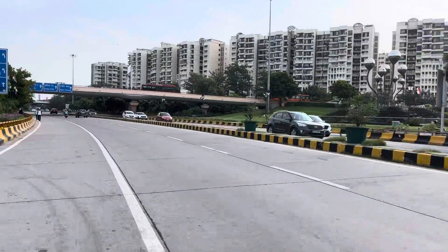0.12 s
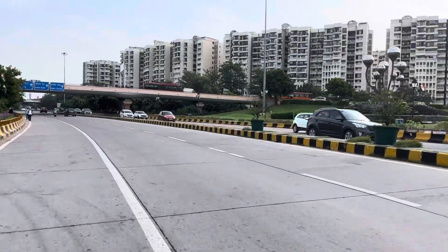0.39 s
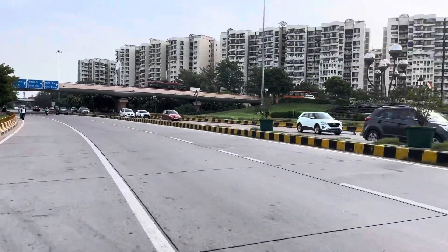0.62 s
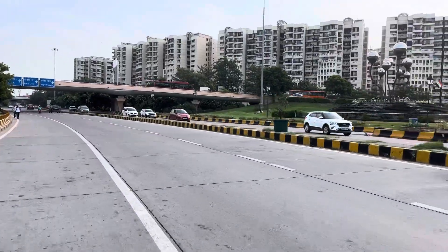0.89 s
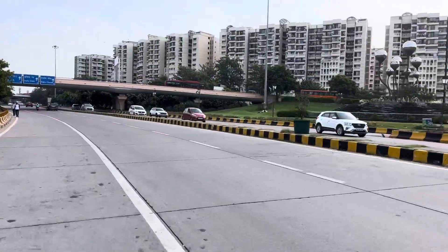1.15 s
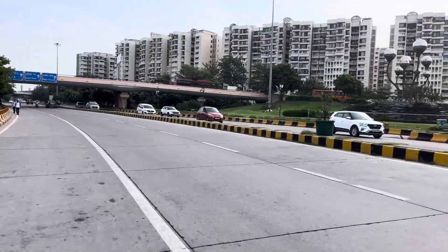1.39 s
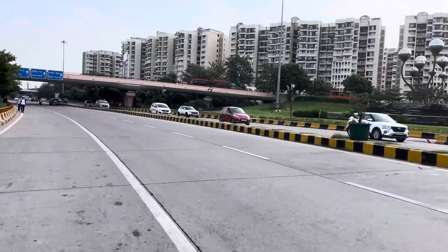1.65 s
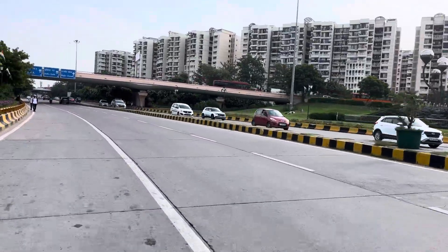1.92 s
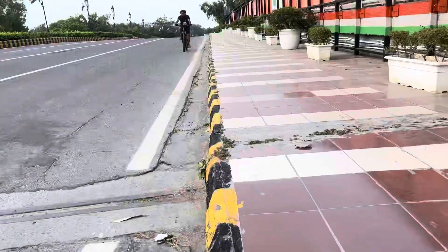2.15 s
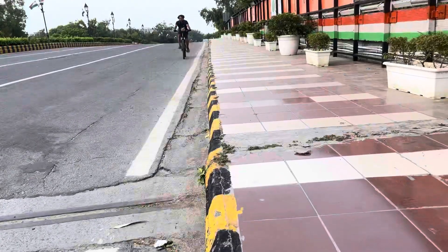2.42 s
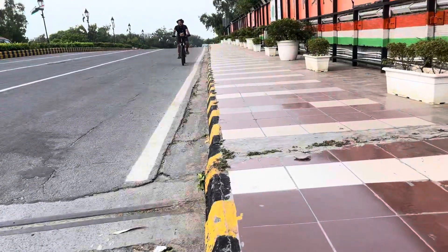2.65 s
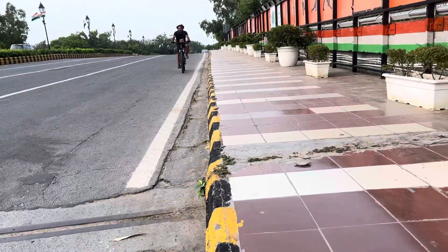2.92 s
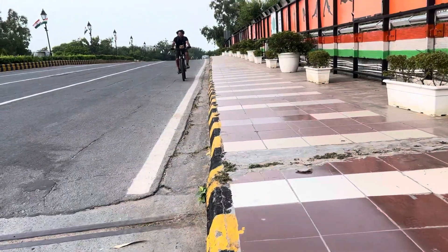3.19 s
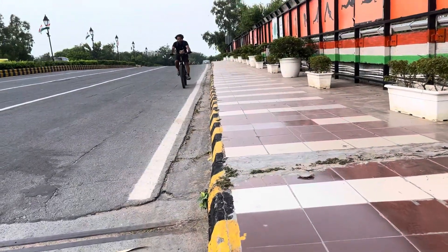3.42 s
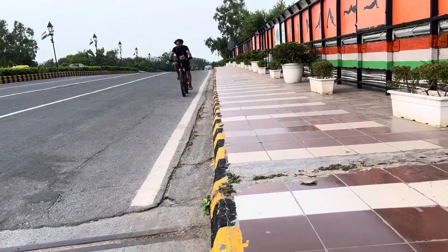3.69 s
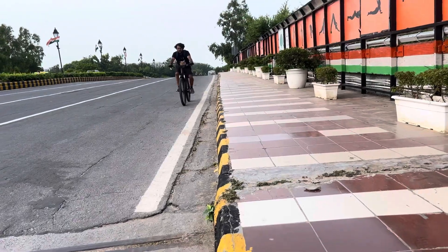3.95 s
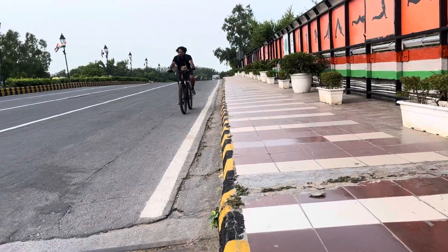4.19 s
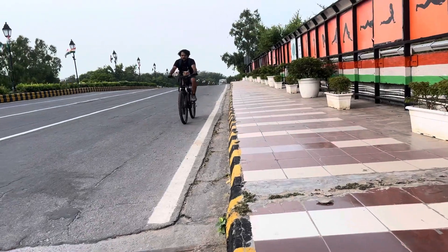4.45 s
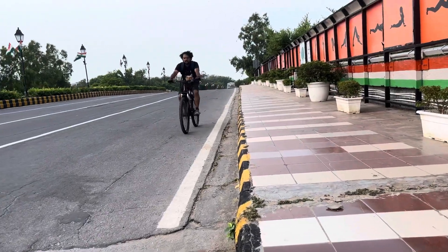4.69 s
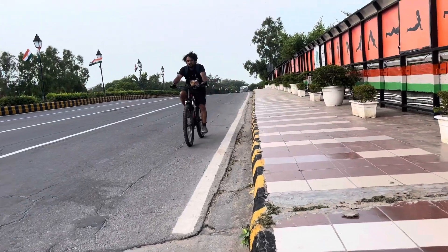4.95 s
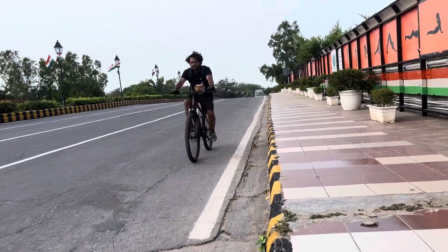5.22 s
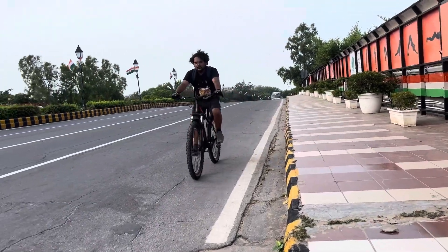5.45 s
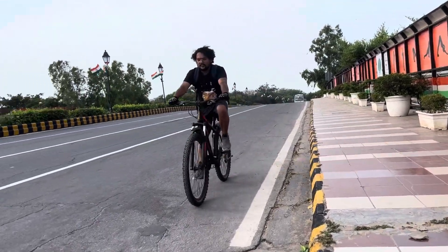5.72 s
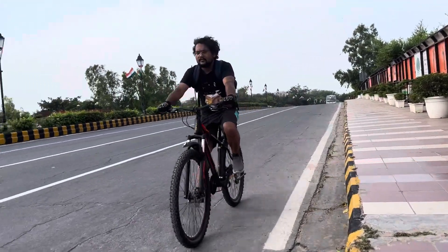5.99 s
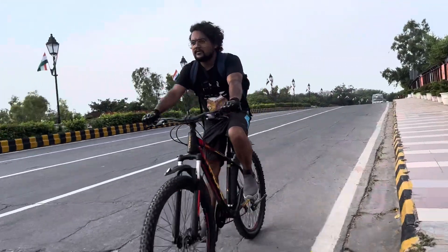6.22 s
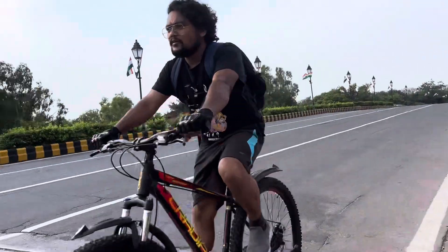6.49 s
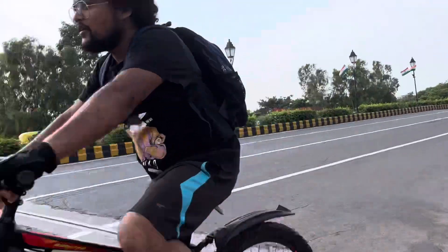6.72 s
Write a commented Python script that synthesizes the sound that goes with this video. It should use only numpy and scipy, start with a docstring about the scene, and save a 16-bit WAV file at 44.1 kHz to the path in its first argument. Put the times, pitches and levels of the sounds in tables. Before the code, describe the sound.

Handheld stereo microphone at the roadside, wind buffeting in low thuds over dull traffic. One brief two-tone-like beep, then a single-cylinder motorbike swells from behind. Suddenly another street: a strong tyre wash and diesel hum recede, metal rattles over bumps, and two quick slaps mark a road joint. Quieter traffic and a wavering low drone remain while knobbly bicycle tyres and crisp, uneven freewheel clicks come near.

```python
"""A wide highway is heard first: far traffic, thumping wind, a short horn and a motorbike closing in.
Then an avenue: a heavy vehicle draws away as loose metal rattles, an engine drones, a bicycle rolls up ticking.
Traffic and tyres are coloured noise, engines and horn are wandering sines, and metal is struck resonances.
A pair of microphone ports hears each source with its own lead, tilt and share of common sound."""
import sys
import numpy as np
from scipy import signal
from scipy.fft import rfft, irfft, next_fast_len
from scipy.io import wavfile
from scipy.ndimage import uniform_filter1d, map_coordinates

SR = 44100
rng = np.random.default_rng(int(sys.argv[2]) if len(sys.argv) > 2 else 0)


def to_wav(sig):
    """Store sig (one row per channel, or 1-D mono) as 16-bit WAV at the path in sys.argv[1].

    Samples outside -1..1 are clipped; the rate is SR.
    """
    pcm = np.clip(np.atleast_2d(sig), -1, 1) * 32767
    pcm = np.round(pcm).astype(np.int16)
    wavfile.write(sys.argv[1], SR, pcm.T)  # frames by channels


def decibels_to_gain(level_db):
    """Convert a level in decibels to a linear amplitude gain (20 dB per decade)."""
    exponent = np.asarray(level_db, float) / 20
    return 10 ** exponent


N = 302526

# The two ports. Each row: frequency in Hz, share of sound common to both from 0 to 1.
COMMON_SHARE = [(60, .955), (200, .84), (400, .5), (900, .7), (1500, .75), (2500, .5), (4000, .3),
                (6500, .55), (7300, .4), (7800, 1), (9000, 1), (10000, .45), (10900, 1), (13000, 1),
                (13800, .4), (14500, 1)]
# Balance of the ports. Each row: frequency in Hz, left over right in dB.
PORT_TILT = [(100, -1), (300, -1), (1500, -2), (1800, 0), (2500, -0.5), (4500, 3), (8000, 0)]
# Lead of the left port, by direction. Each row: frequency in Hz, lead in radians.
LEAD_AHEAD = [(0, 0), (400, .3), (700, 1.5), (1600, 2.2), (1750, 1), (3000, .6), (5000, .4), (6500, -1.3)]
LEAD_BEHIND = [(0, 0), (150, -.3), (400, -1.5), (700, -2.7), (1500, -3), (1750, -5), (4000, -6.3),
               (5500, -6.6), (6500, -7.3)]
LEAD_ALONG = [(0, 0), (200, .3), (400, .8), (700, 1.5), (1600, 2.5), (1750, 1.2), (3100, 2.5), (4000, 4.8),
              (6500, 5.7)]
# Treble arrives alike from every direction. Each row: frequency in Hz, lead of the left port in half turns.
TREBLE_LEAD = [(7800, -1), (9000, -1), (10900, -2), (13000, -2), (14500, -3), (22000, -3)]

# Traffic in each place. Each row: time in seconds, levels of rumble, body, tyre roar and tread hiss in dB.
HIGHWAY_LEVELS = [(0, -21, -33, -32, -51.5), (.25, -27.5, -32.5, -32.5, -49), (.6, -23.5, -32, -35, -48),
                  (.9, -26, -32.5, -34.5, -50), (1.15, -24, -34.5, -35, -47), (1.35, -23, -36, -34, -43),
                  (1.75, -20, -33, -29, -37.5), (2.08, -20.5, -29, -24.5, -45)]
AVENUE_LEVELS = [(2.1, -19.5, -20, -24, -35.5), (2.35, -32, -22, -25, -38), (2.6, -21, -22, -26.5, -42),
                 (2.85, -25.5, -25.5, -28, -43.5), (3.05, -26, -25, -29.5, -44),
                 (3.25, -26.5, -28, -29.5, -44), (3.4, -23, -28, -29, -45.5), (3.55, -27, -29, -32.5, -48),
                 (4.1, -27, -28, -32, -48.5), (4.9, -28.5, -28.5, -33.5, -50.5),
                 (5.7, -26, -28.5, -34, -51), (6.1, -26, -30, -34, -51), (6.86, -27, -28.5, -35, -48.5)]
# Colours of rumble, body, tyres and hiss, in that order. Each row: frequency in Hz, relative level in dB per Hz.
HIGHWAY_COLOURS = ([(18, -120), (25, -38), (40, -22), (60, 0), (90, -1.5), (115, -13), (170, -13.5),
                   (300, -120)], [(60, -120), (95, -41), (125, -3), (200, -4), (300, -8.5), (370, -11.5),
                   (450, -22), (700, -34), (1200, -120)], [(250, -120), (400, 3), (600, -0.5), (1100, 1.5),
                   (1600, -2.5), (2000, -9.5), (2600, -23.5), (3500, -43), (6000, -120)], [(1300, -120),
                   (2000, 2.5), (2600, -1.5), (3500, -6.5), (5000, -16.5), (7000, -17.5), (11000, -27),
                   (13500, -40), (15200, -27), (16500, -47)])
AVENUE_COLOURS = ([(18, -120), (25, -28), (38, -12), (55, -0.5), (85, -5), (115, -13), (170, -21),
                  (300, -120)], [(60, -120), (95, -14), (125, 1), (200, -4), (300, -7.5), (450, -14.5),
                  (700, -25), (1200, -120)], [(250, -120), (400, -1), (600, -2.5), (900, 0.5), (1250, -4),
                  (1600, -5.5), (1800, -14), (2400, -20.5), (3500, -37), (6000, -120)], [(1300, -120),
                  (2000, 3), (2800, 4), (4500, -1), (6500, -8), (8000, -13), (11000, -20), (13500, -21.5),
                  (15200, -33), (16500, -53)])
# Slow swells of wind. Each row: time in seconds, half length in seconds, rise of rumble in dB, rise of body in dB.
GUSTS = [(3.34, 0.2, 4, 6), (4.3, 0.14, 2, -0.5), (5.116, 0.15, 2.5, -1.5), (6.54, 0.17, 4.5, 0.5)]
# Single eddies thump the ports. Each row: time in seconds, half length in seconds, pitch at the middle in Hz,
# peak level in dB, rise of the traffic body in dB.
THUMPS = [(0.033, 0.037, 58, -18, 8.5), (0.092, 0.013, 69, -14, 3.5), (0.13, 0.031, 64, -13, 8.5),
          (.192, 0.012, 110, -11, 13.5), (0.285, 0.014, 85, -14.5, 2), (0.312, 0.027, 52.3, -23.5, 5),
          (0.348, 0.0065, 110, -17, 8.5), (0.405, 0.013, 71.5, -14.5, 7), (0.466, 0.032, 70.4, -19, 7.5),
          (0.517, 0.014, 75, -15.5, 8), (0.558, 0.019, 85, -17.5, 8), (0.586, 0.0071, 297, -18, 5),
          (0.598, 0.016, 141, -13.5, 8), (0.62, 0.01, 222, -12.5, 1.5), (.63, 0.016, 91, -7.5, 5),
          (.65, 0.0064, 173, -10, 7), (0.67, 0.007, 248, -16, 3), (0.677, 0.01, 107, -9.5, 4),
          (.697, 0.007, 116, -11.5, 5), (0.707, 0.0067, 230, -16, 7), (0.73, .015, 66, -14, 2),
          (0.762, 0.0072, 305, -18, 4.5), (0.774, 0.013, 96, -14.5, 8), (0.851, 0.018, 82.6, -12.5, 2),
          (0.958, 0.011, 84.5, -11.5, 7), (0.988, 0.019, 91, -13.5, 9), (1.122, 0.01, 81.5, -18, 0),
          (1.199, 0.013, 75, -13.5, 0), (5.665, 0.021, 90, -18.5, 4.5), (5.676, 0.005, 202, -20, 3),
          (5.706, 0.0074, 127, -18, 3), (5.72, 0.028, 69.6, -15, 5.5), (6.347, 0.02, 75, -16, 6.5)]
# A short blip at 990 Hz in the noise, then three small hollow knocks. Each row: start in seconds,
# level in dB before the onset softens it, pitch in Hz, time to fall 60 dB in seconds.
BLIP_AND_KNOCKS = [(.2965, -20, 990, 0.014), (2.495, -18, 806, 0.11), (5.536, -14, 760, 0.032),
                   (6.635, -31, 631, 0.33)]

# Motorbike. Each row: time in seconds, firing rate in Hz, exhaust level in dB, clatter level in dB.
BIKE = [(0, 30.23, -40, -56.5), (.9, 30.27, -34.5, -53.5), (1.34, 31.21, -31.5, -52),
        (1.62, 31.6, -30.5, -50.5), (1.74, 31.9, -30, -42.5), (1.88, 32.27, -30.5, -34),
        (2.08, 32.95, -25.5, -30.5)]
# Exhaust orders. Each row: multiple of the firing rate, relative level in dB, gain in dB at full throttle.
EXHAUST_ORDERS = [(1, -33, 0), (2, -9.5, 1), (3, 1.5, -5), (4, -15.5, 13.5), (5, -8.5, 4), (6, -2.5, -0.5),
                  (7, -5, -1), (8, -11, -3.5), (9, -14, 3), (10, -16, -1), (11, -17.5, 8), (12, -18.5, 1),
                  (13, -28, -6), (14, -20, 5)]
# Throttle. Each row: time in seconds, opening from 0 to 1.
THROTTLE = [(1.4, 0.07), (1.65, 0.2), (1.85, 0.82), (2.0, 0.8), (2.08, 0.8)]
# Colour of the valve and chain clatter. Each row: frequency in Hz, relative level in dB per Hz.
CLATTER_COLOUR = [(1200, -120), (2200, -2.5), (3200, 6.5), (5000, 3.5), (7500, -1), (11000, -3.5),
                  (13500, -7), (15200, -4), (16500, -34)]
# Horn partials. Each row: pitch in Hz, level at full drive in dB, dB lost per dB of weaker drive, waver in dB.
HORN_PARTIALS = [(464, -34, 0.6, -1.5), (925, -32, 1.4, 1), (1375, -44, 1.5, 3), (1865, -41, 0.5, 2.5)]
# The horn speaks weakly, then fully. Each row: time in seconds, drive in dB.
HORN_DRIVE = [(1.155, -40), (1.175, -6), (1.2, -4.5), (1.215, 0), (1.395, -1), (1.42, -6), (1.445, -40)]
# Whistling bands as the motorbike nears. Each row: time in seconds, level of them together in dB.
WHINE_LEVEL = [(1.3, -49.5), (1.45, -42), (1.6, -44), (1.8, -46), (2.08, -52)]
# The bands themselves. Each row: centre in Hz, width in Hz, relative level in dB.
WHINE_BANDS = [(2340, 55, -3.5), (2720, 32, -2.5), (2950, 73, -9)]
# Short narrow peaks in the patchy clatter as the motorbike nears. Each row: time in seconds,
# half length in seconds, pitch at the middle in Hz, peak level in dB.
CLATTER_PEAKS = [(1.465, 0.014, 2690, -38), (1.59, 0.028, 2400, -36), (1.61, .015, 1644, -31),
                 (1.79, 0.016, 3230, -36), (1.835, 0.024, 1925, -32), (1.91, 0.014, 1990, -30),
                 (1.91, .015, 2720, -37), (2.02, .02, 2950, -43)]

# Upper edge of the avenue's tyre roar. Each row: time in seconds, level in dB.
RIB_LEVEL = [(2.1, -37), (2.6, -43), (2.8, -34.5), (3.1, -31.5), (3.45, -33), (3.6, -36.5), (4.5, -44),
             (5.5, -44.5), (6.86, -65)]
# Its colour. Each row: frequency in Hz, relative level in dB per Hz.
RIB_COLOUR = [(800, -120), (1050, 4), (1350, -3.5), (1610, -2), (1680, -33), (2000, -120)]
# Two axles cross a joint in the road. Each row: start in seconds, peak level in dB.
JOINT_SLAPS = [(3.258, -23.5), (3.382, -22)]
# Colour of the slap. Each row: frequency in Hz, relative level in dB per Hz.
JOINT_COLOUR = [(350, -120), (600, -2), (1000, -1), (1600, 1), (1720, -14), (2500, -120)]
# Heavy diesel. Each row: time in seconds, firing rate in Hz, firing level in dB, third-order level in dB.
LORRY = [(2.1, 55.8, -18.5, -24.5), (2.4, 55.9, -20, -22), (2.6, 56.4, -25, -27), (2.9, 56.5, -24, -44)]
# Rattles. Each row: start in seconds, peak level of the high modes in dB, added left over right in dB,
# low modes over high modes in dB.
RATTLES = [(2.1594, -37, -5, -5), (2.19, -46, -2, -1), (2.2294, -47, -4, 4), (2.58, -42, -4, -0.5),
           (2.612, -50, -2, 2.5), (2.6894, -49, -3, 2), (2.86, -51, -6, -3), (3.01, -43, -17, -6.5),
           (3.055, -50, -4, 3), (3.1431, -50, -1, -4), (3.2201, -49, 0, -2), (3.325, -46.5, -3, -2),
           (3.3832, -54, 0, 4), (3.4705, -53, -1, -4), (3.8112, -59, -2, 1), (4.3889, -54.5, -2, -4),
           (4.543, -52.5, -2, -5), (4.7701, -52.5, 0, -5), (5.0669, -54.5, -1.5, -3), (5.5267, -56, -2, -8)]
# The metal never quite rests between bumps. Each row: time in seconds, level in dB.
JINGLE_LEVEL = [(2.1, -58), (2.4, -57.5), (3.0, -58.5), (3.4, -58), (3.7, -62), (4.5, -68), (5.5, -71),
                (6.86, -89)]
# What rattles: a list of low modes, then one of high modes. Each row: centre in Hz, width in Hz, relative level in dB.
LOOSE_MODES = ([(3470, 300, -1.5), (4200, 270, 1), (5200, 500, -3.5)], [(6090, 240, 2.5), (6870, 240, 0),
               (7550, 200, -4), (8220, 240, -4), (11800, 2000, -21)])
# Droning engine. Each row: time in seconds, pitch in Hz, level in dB, octave level in dB.
# The note sits 2.5 dB under its level, the octave does not.
DRONE = [(3.5, 126.7, -36, -46), (4.3, 124.1, -42, -42.5), (5, 125.5, -43, -47), (5.5, 124.4, -28, -45.5),
         (6, 124.6, -29, -39.5), (6.3, 125.6, -32.5, -45), (6.6, 124.5, -26, -43.5),
         (6.86, 122.9, -27, -42)]

# Freewheel ticking, faster when the chain is wound back, slower when it is eased forward.
# Each row: time in seconds, rate in ticks per second.
RATCHET = [(5.8904, 50.81), (5.958, 44.56), (6.019, 28.38), (6.12, 18.3), (6.367, 43.35), (6.612, 32.83),
           (6.686, 34.83), (6.709, 25.92), (6.86, 37.75)]
# Stray clicks before coasting. Each row: start in seconds, level in dB.
STRAY_CLICKS = [(4.5006, -44), (4.7128, -46), (4.8513, -51), (5.6954, -59), (5.7238, -62), (5.7473, -50),
                (5.8361, -51)]
# Ringing modes of the pawl. Each row: centre pitch in Hz, relative level in dB, time to fall 60 dB in seconds.
PAWL_MODES = [(6300, -9, .014), (7600, -12, .012), (9300, -8, .014), (11000, -8, .014), (12800, -4, .016),
              (13700, -7, .013), (14700, -5, .014)]
# The hub shell that rings after a snap. Each row: centre in Hz, width in Hz.
HUB_MODES = [(3200, 300), (4170, 160), (5240, 400), (6400, 350)]
# Each hub mode beams its own way, so the blend shifts as the wheel turns side-on.
# Each row: time in seconds, then the relative level of each of the four modes in dB.
HUB_FACING = [(5.9, -20, -14, -17, -16), (6.2, -10, -2.5, -14, -8), (6.5, -8, -1.5, -18, -6.5),
              (6.66, -7, -6, -12, -4), (6.86, 1, -14, -5, -7)]
# Colour of the chain's whirr. Each row: frequency in Hz, relative level in dB per Hz.
WHIRR_COLOUR = [(5000, -120), (8000, -2), (11000, -10), (14500, -2), (16000, -3)]
# Colour of the knobbly tyres. Each row: frequency in Hz, relative level in dB per Hz.
KNOB_COLOUR = [(300, -120), (500, 6), (900, 2), (2000, 1), (3000, 0.5), (5000, -25), (7500, -10),
               (10000, -120)]

CUT_S = 2.09  # the highway gives way to the avenue
SPEED_M_S, PASS_S, CLOSEST_M = 3.44, 6.98, 0.95  # the bicycle's straight path


def unit(x):
    """Scale to rms 1."""
    return x / np.sqrt(np.mean(x ** 2) + 1e-20)


def along(points, hz):
    """Read (Hz, value) points on a log frequency axis."""
    f, v = np.transpose(points)
    return np.interp(np.log(hz + 1), np.log(f + 1), v)


def curves(rows):
    """One value per sample for each column after the time."""
    s, *cols = np.transpose(rows)
    return [np.interp(np.arange(N) / SR, s, c) for c in cols]


def gate(start, stop, ramp):
    """1 between two moments, with soft edges inside them."""
    t = np.arange(N) / SR
    return np.clip((t - start) / ramp, 0, 1) * np.clip((stop - t) / ramp, 0, 1)


def wobble(rate):
    """A smooth random curve with so many knots a second."""
    knots = rng.standard_normal(int(N * rate / SR) + 4)
    return map_coordinates(knots, [np.arange(N) * rate / SR])


def noise():
    """Two unrelated white noises."""
    return rng.standard_normal((2, N))


def filtered(x, response):
    """Shape x by a complex response of frequency."""
    m = next_fast_len(N + 8192)
    return irfft(rfft(x, m) * response(np.fft.rfftfreq(m, 1 / SR)), m)[..., :N]


def rush(colour, patchy_db):
    """Two unrelated noises of one colour, rms 1, with patches of random gain in time and frequency."""
    z = signal.stft(noise(), nperseg=512)[2]
    field = uniform_filter1d(rng.standard_normal(z.shape[1:]), size=6, axis=0)
    field = uniform_filter1d(field, size=12, axis=1)
    pair = signal.istft(z * decibels_to_gain(patchy_db * unit(field)), nperseg=512)[1][:, :N]
    return unit(filtered(pair, lambda hz: decibels_to_gain(along(colour, hz))))


def rings(modes):
    """Causal response of a few resonances of alternating sign."""
    def response(f):
        total = 0
        for k, (centre, width, db) in enumerate(modes):
            peak = 1j * f * width / (centre * centre - f * f + 1j * f * width)
            total = total + (-1) ** k * decibels_to_gain(db) * peak
        return total
    return response


def ports(pair, lead, most=1):
    """Direct sound (row 0) reaches the ports with a lead between them; scattered sound (row 1) sets them apart."""
    turns = round(lead[-1][1] / (2 * np.pi))  # joins the treble lead to the nearest whole turn
    lead = lead + [(hz, np.pi * (k + 2 * turns)) for hz, k in TREBLE_LEAD]

    def mix(hz):
        spread = np.arccos(np.clip(along(COMMON_SHARE, hz), 0, min(most, 1))) / 2
        direct, scattered = np.cos(spread), np.sin(spread)
        # tilt and lead are split evenly between the ports
        half = decibels_to_gain(along(PORT_TILT, hz) / 2) * np.exp(.5j * np.interp(hz, *np.transpose(lead)))
        return np.array([[half * direct, half * scattered], [direct / half, -scattered / half]])
    return filtered(pair[None], mix).sum(axis=1)


def tone(hz, rough):
    """A sine of rms 1 whose phase wanders, as direct sound and a scattered copy."""
    phase = 2 * np.pi * np.cumsum(hz * np.ones(N)) / SR + rough * wobble(12)
    return np.sqrt(2) * np.sin([phase, phase + 2 * wobble(6.4)])


def bursts(events, rise, t60, spike):
    """Envelopes that swell quickly and die away, one for each (s, dB), roughened by spike dB of wobble."""
    t = np.arange(SR // 4) / SR
    shape = decibels_to_gain(-60 * t / t60) * (1 - np.exp(-t / rise))
    size = np.zeros(N + SR)
    for s, db in events:
        size[round(s * SR):][:len(t)] += decibels_to_gain(db) * shape / shape.max()
    return size[:N] * decibels_to_gain(spike * wobble(400))


def swells(events):
    """Bell-shaped rises in dB, one for each (s, half length s, dB)."""
    t = np.arange(N) / SR
    return sum(db * np.exp(-((t - s) / half) ** 2) for s, half, db in events)


def puffs(events, bend):
    """Short gliding sines under a bell-shaped envelope, one for each (s, half length s, Hz, dB)."""
    out = np.zeros(N + SR)
    chance = rng.random((len(events), 2))
    t = np.arange(-SR // 8, SR // 8) / SR
    for (s, half, hz, db), (phase, glide) in zip(events, chance):
        cycles = phase + hz * t * (1 + bend * (glide - .5) * t / half)
        out[round(s * SR):][:len(t)] += decibels_to_gain(db) * np.exp(-(t / half) ** 2) * np.sin(2 * np.pi * cycles)
    return np.array([out[SR // 8:][:N], np.zeros(N)])


def traffic(levels, colours):
    """Engines, wind round the ports, tyre roar and tread hiss of many vehicles, as unsteady coloured noise."""
    rumble_db, body_db, tyre_db, hiss_db = curves(levels)
    s, half, low_db, mid_db = np.transpose(GUSTS)
    rumble_db = rumble_db + swells(zip(s, half, low_db)) + 0.91 * wobble(9)
    eddy_db = swells((at, width, db) for at, width, _, _, db in THUMPS)
    body_db = body_db + eddy_db + swells(zip(s, half, mid_db)) + 0.71 * wobble(14)
    rumble = decibels_to_gain(rumble_db) * rush(colours[0], patchy_db=-0.35)
    body = decibels_to_gain(body_db) * rush(colours[1], patchy_db=0.7)
    tyres = decibels_to_gain(tyre_db + .5 * wobble(13)) * rush(colours[2], patchy_db=1.4)
    hiss = decibels_to_gain(hiss_db + 1.18 * wobble(12)) * rush(colours[3], patchy_db=1.54)
    return rumble + body + tyres + hiss


def wind_thumps():
    """Each eddy pushes on the ports as one short low tone that glides a little."""
    return puffs([row[:4] for row in THUMPS], bend=0.25)


def motorbike():
    """A single cylinder: clean exhaust orders, and valve and chain clatter that pulses with each firing."""
    hz, exhaust_db, clatter_db = curves(BIKE)
    opening, = curves(THROTTLE)
    sixth_db = EXHAUST_ORDERS[5][1]  # the sixth order is the reference for the exhaust level
    exhaust = 0
    for order, db, gain_db in EXHAUST_ORDERS:
        order_db = db - sixth_db + gain_db * opening + 1.3 * wobble(5)
        exhaust = exhaust + decibels_to_gain(order_db) * tone(order * hz, rough=0.018 * order)
    beat = decibels_to_gain(0.88 * np.cos(2 * np.pi * np.cumsum(hz) / SR) + 1.8 * wobble(60))
    clatter = decibels_to_gain(clatter_db) * unit(beat * rush(CLATTER_COLOUR, patchy_db=1.5))
    return gate(0.75, 3.4, ramp=0.15) * decibels_to_gain(exhaust_db) * exhaust + clatter


def blip_and_knocks():
    """A short blip in the noise, then three soft blows on something hollow: one decaying sine each."""
    out, t = np.zeros(N + SR), np.arange(SR // 8) / SR
    for s, db, hz, t60 in BLIP_AND_KNOCKS:
        envelope = decibels_to_gain(db - 60 * t / t60) * (1 - np.exp(-t / 0.0012))
        out[round(s * SR):][:len(t)] += envelope * np.sin(2 * np.pi * hz * t)
    return np.array([out[:N], np.zeros(N)])


def horn():
    """A short electric horn some way off, heard directly; its partials waver a little in the air."""
    drive_db, = curves(HORN_DRIVE)
    partials = 0
    for hz, db, steep, waver_db in HORN_PARTIALS:
        partials = partials + decibels_to_gain(db + steep * drive_db + waver_db * wobble(22)) * tone(hz, rough=.1)
    return partials * [[1], [0]]  # direct sound only


def whine():
    """Narrow bands of noise whistle and waver, each on its own, as the motorbike nears."""
    bands = sum(decibels_to_gain(1.8 * wobble(15)) * filtered(noise(), rings([band])) for band in WHINE_BANDS)
    return decibels_to_gain(curves([(0, -94)] + WHINE_LEVEL)[0]) * unit(bands)


def clatter_peaks():
    """Short narrow peaks in the patchy clatter as the motorbike nears, each a brief sine that bends slightly."""
    return puffs(CLATTER_PEAKS, bend=.03)


def tread_ribs():
    """Tread ribs sing in a fluttering band of noise with a sharp top."""
    return decibels_to_gain(curves(RIB_LEVEL)[0] + 2.5 * wobble(20.7)) * rush(RIB_COLOUR, patchy_db=0.0)


def lorry():
    """A diesel drawing away: firing note and third order, both with wandering phase."""
    hz, db, third_db = curves(LORRY)
    notes = decibels_to_gain(db) * tone(hz, rough=.5) + decibels_to_gain(third_db) * tone(3 * hz, rough=.8)
    return gate(0.81, 2.91, ramp=0.68) * notes


def rattles():
    """Loose metal shaken at each bump rings in low and high modes, leaning right by an amount that varies by hit."""
    s, db, pan_db, low_db = np.transpose(RATTLES)

    def metal(modes):
        resonance = rings(modes)
        return unit(filtered(noise(), lambda hz: resonance(hz) * np.clip(hz / 3500, 0, 1) ** 2))
    low, high = [metal(modes) for modes in LOOSE_MODES]
    shake = bursts(zip(s, db + low_db), rise=0.0045, t60=0.25, spike=2) * low
    shake = shake + bursts(zip(s, db), rise=0.0043, t60=0.15, spike=1.1) * high
    jingle = decibels_to_gain(curves(JINGLE_LEVEL)[0] + 2.5 * wobble(30)) * (low + high)
    pan = decibels_to_gain(np.outer([.5, -.5], curves(np.c_[s, pan_db])[0]))
    return ports(shake + jingle, LEAD_ALONG, most=0.9) * pan


def drone():
    """An engine note and its octave fade in, wavering in the moving air."""
    hz, db, octave_db = curves(DRONE)
    waver_db = 2.5
    note = decibels_to_gain(db - waver_db + waver_db * wobble(9)) * tone(hz, rough=1.5)
    octave = decibels_to_gain(octave_db + waver_db * wobble(13)) * tone(2 * hz, rough=1.67)
    return gate(2.94, 8, ramp=0.37) * (note + octave)


def road_joint():
    """Each axle slaps the road joint: a burst of noise in the ribs' band and below."""
    return bursts(JOINT_SLAPS, rise=.003, t60=.16, spike=1) * rush(JOINT_COLOUR, patchy_db=1)


def wheel_distance(s):
    """Metres from the ports to a bicycle riding a straight line at steady speed."""
    return np.hypot(CLOSEST_M, SPEED_M_S * (s - PASS_S))


def tyre_roll():
    """Knobbly bicycle tyres: fluttering noise, louder as the distance shrinks."""
    level_db = -43 + 1.8 * wobble(25)  # at 1 m
    return decibels_to_gain(level_db) / wheel_distance(np.arange(N) / SR) * rush(KNOB_COLOUR, patchy_db=3.0)


def pawl_strikes():
    """A strike (s, dB) for each ratchet tooth passed, falling off with distance and scattered in level."""
    rate, = curves(RATCHET)
    coasting = np.arange(N) >= RATCHET[0][0] * SR
    teeth = np.cumsum(rate * coasting) / SR
    s = np.flatnonzero(np.diff(np.ceil(teeth))) / SR
    near_db = -20 * np.log10(wheel_distance(s))
    return list(zip(s, -38 + near_db + 1.6 * rng.standard_normal(len(s))))  # -38 dB at 1 m


def snaps(events):
    """Each strike rings the pawl's modes at new strengths and slightly new pitches, over a crack of noise."""
    out, t = np.zeros((2, N + SR)), np.arange(SR // 25) / SR
    hz, mode_db, t60 = np.transpose(PAWL_MODES)[..., None]
    crack_db, crack_t60_s, rise_s = 3.5, .021, .0006
    for s, db in events:
        size, pitch, phase = rng.standard_normal((3, len(PAWL_MODES), 1))
        decay = decibels_to_gain(mode_db + 3.3 * size - 60 * t / t60)
        ring = decay * np.sin(2 * np.pi * hz * (1 + .025 * pitch) * t + phase)
        bright = np.diff(rng.standard_normal((2, len(t) + 1))) / np.sqrt(2)  # noise tilted to the treble
        crack = decibels_to_gain(crack_db - 60 * t / crack_t60_s) * bright
        snap = ring.sum(axis=0) * [[1], [.3]] + crack
        out[:, round(s * SR):][:, :len(t)] += decibels_to_gain(db) * (1 - np.exp(-t / rise_s)) * snap
    return out[:, :N]


def hub_ring(strikes):
    """The hub shell answers each strike with noise through its modes, their blend shifting as the wheel turns."""
    shell = 0
    for (hz, width), db in zip(HUB_MODES, curves(HUB_FACING)):
        mode = unit(filtered(noise(), rings([(hz, width, 0)])))
        shell = shell + decibels_to_gain(db + 2.5 * wobble(25)) * mode
    return decibels_to_gain(-5.5) * bursts(strikes, rise=.0015, t60=.07, spike=2) * shell  # shell against snap


def chain_whirr():
    """High noise of the chain, rising in level with the tick rate."""
    rate, = curves(RATCHET)
    level_db = -81 + .45 * rate  # chain at rest, plus dB for each tick per second
    return gate(5.55, 8, ramp=.35) * decibels_to_gain(level_db) * rush(WHIRR_COLOUR, patchy_db=2)


def bicycle():
    """Tyres roll and stray clicks sound, then pawls snap over the ratchet with hub ring and chain whirr."""
    strikes = pawl_strikes()
    return tyre_roll() + snaps(STRAY_CLICKS + strikes) + hub_ring(strikes) + chain_whirr()


def scene():
    """The highway fades out in a moment and the avenue fades in; wind thumps, blip and knocks lie over the pair."""
    highway = ports(traffic(HIGHWAY_LEVELS, HIGHWAY_COLOURS) + horn(), LEAD_AHEAD)
    highway = highway + ports(motorbike() + whine() + clatter_peaks(), LEAD_BEHIND)
    road = traffic(AVENUE_LEVELS, AVENUE_COLOURS) + tread_ribs() + road_joint()
    avenue = ports(road + lorry() + drone(), LEAD_ALONG) + rattles()
    avenue = avenue + ports(bicycle(), LEAD_ALONG, most=0.52)
    places = gate(-1, CUT_S, ramp=0.0072) * highway + gate(CUT_S, 9, ramp=0.01) * avenue
    return places + ports(blip_and_knocks() + wind_thumps(), LEAD_ALONG)


def roll_off(x):
    """The treble ends steeply here."""
    return signal.sosfilt(signal.butter(12, 15800, fs=SR, output="sos"), x)


def record(dry):
    """The finished mix of both places, as it is stored."""
    return roll_off(dry)


dry = scene()
out = record(dry)
to_wav(out)
```